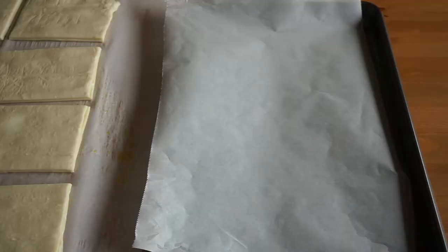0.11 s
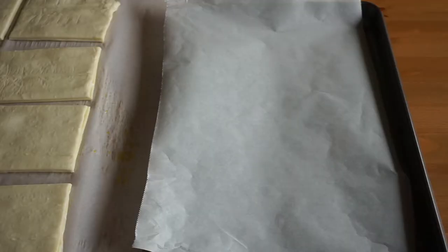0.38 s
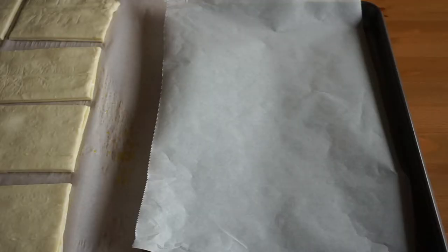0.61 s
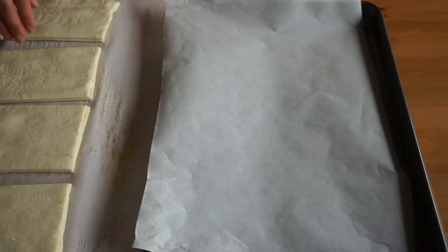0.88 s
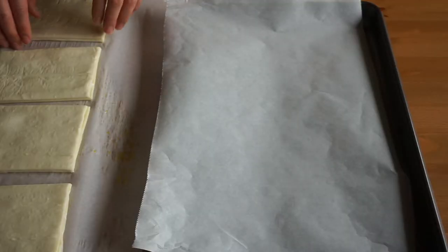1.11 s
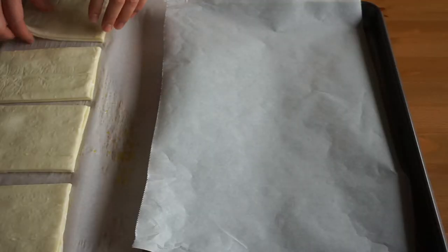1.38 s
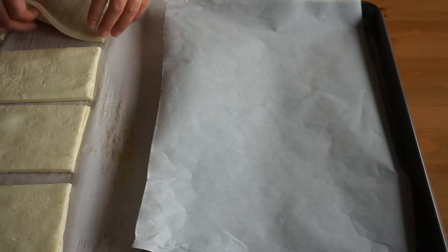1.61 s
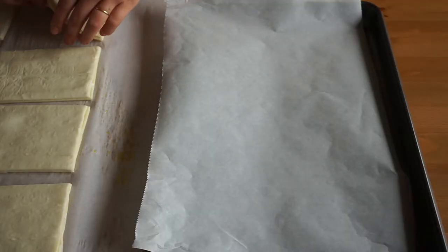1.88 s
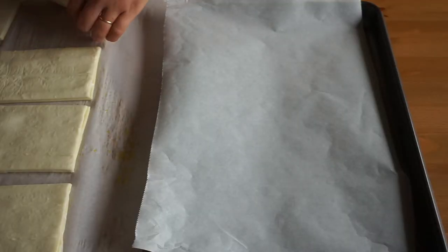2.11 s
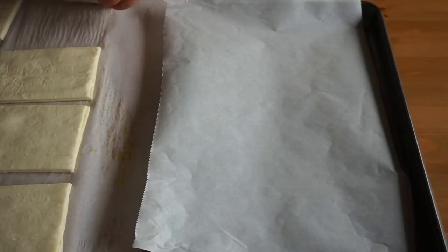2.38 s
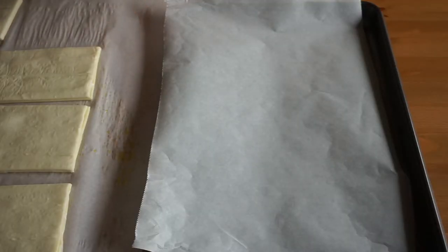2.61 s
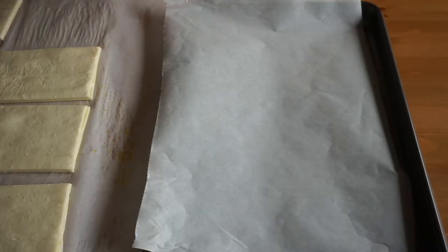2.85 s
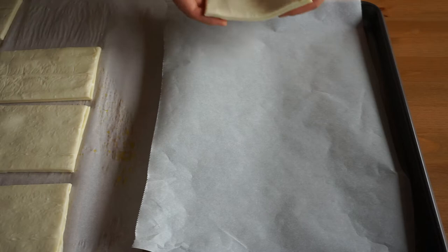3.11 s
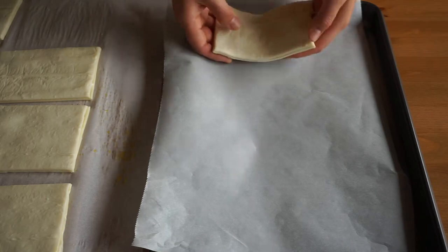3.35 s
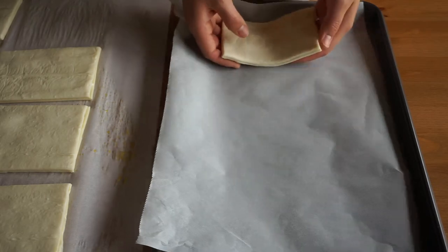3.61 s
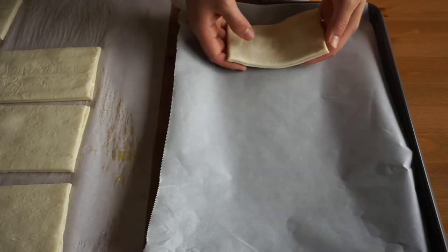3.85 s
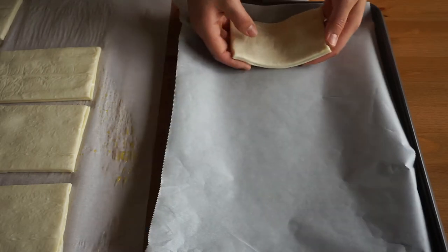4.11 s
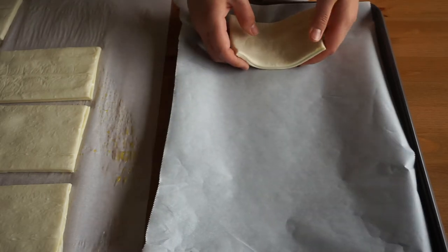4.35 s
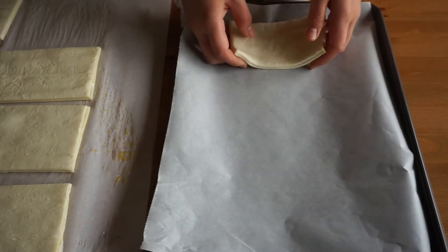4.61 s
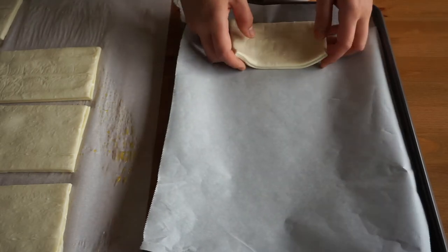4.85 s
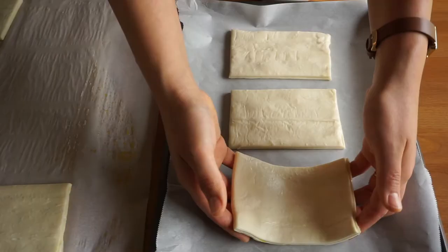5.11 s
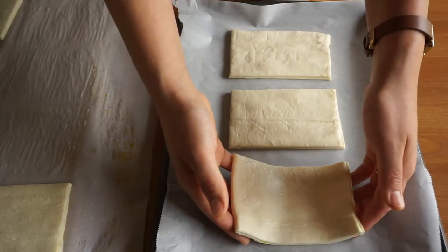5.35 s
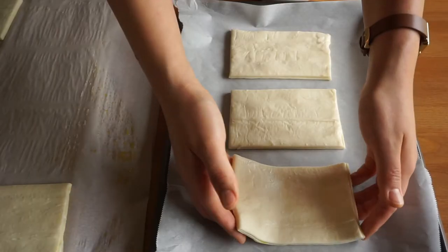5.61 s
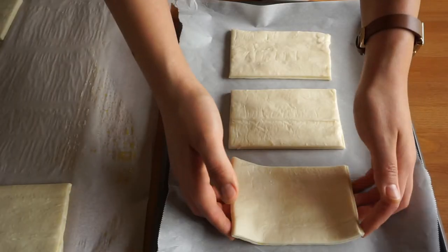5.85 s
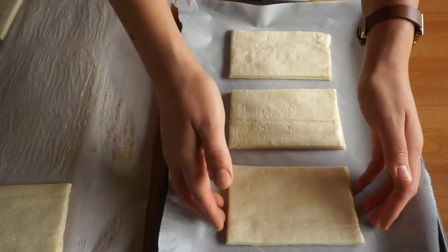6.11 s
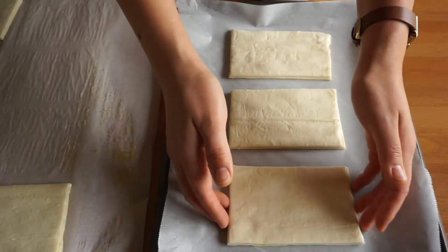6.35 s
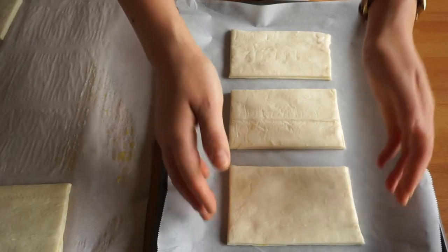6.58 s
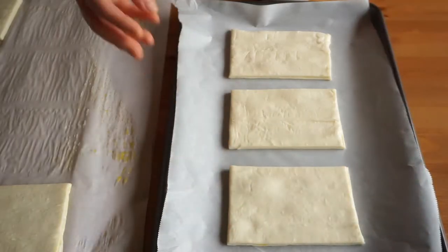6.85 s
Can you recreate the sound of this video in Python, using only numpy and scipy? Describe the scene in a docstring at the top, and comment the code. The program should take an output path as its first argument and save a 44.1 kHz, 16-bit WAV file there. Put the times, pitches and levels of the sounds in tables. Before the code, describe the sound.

A low kitchen appliance hum, deep and slowly beating, runs throughout with soft airy fan noise. For the first 1.3 seconds there is little else, only a very faint squeak near 0.8 and barely audible rubbing on the left. From 1.3 to 2.5 small dry paper ticks appear left of centre, sharpest around 1.8 to 2.0 and again near 2.45, as pastry peels off parchment. A lull follows until 3.3. Then parchment on the tray bursts into loud, dense crackling and hard snaps, strongest at 3.44 and 3.77, now central, with hissy sliding strokes. It thins after 3.8, flares at 4.5 to 4.7, and rubs softly until about 5.1. Quiet brushing leads to another crisp cluster at 5.8 to 5.95, lighter rustling, a clear snap at 6.47, then mostly hum until 7. The paper is close, with a short room tail.

```python
"""Appliances hum in a kitchen, the mains buzz beating slowly against a motor running just below it.
Then slabs of pastry are peeled off one sheet of baking parchment and laid on another, on a tray.
Hum is summed cosines and airflow shaped noise; fingers and dough slide as fluttering noise.
Small folds crackle as clumped, ringing impulses; creases snap as noise bursts of a few ms.
The paper sounds also pass through the echoes and reverberant tail of the kitchen."""
import sys
import numpy as np
from scipy import signal
from scipy.fft import rfft, irfft, next_fast_len
from scipy.io import wavfile

SR = 44100
rng = np.random.default_rng(int(sys.argv[2]) if len(sys.argv) > 2 else 0)


def gain_from_decibels(decibels):
    """Convert decibel values to linear amplitude factors."""
    exponent = np.asarray(decibels, float) / 20
    return 10 ** exponent


def put_to_file(sound):
    """Save the sound as 16-bit audio at rate SR, in the file named by the first command-line argument."""
    columns = np.atleast_2d(sound).T  # one column per channel
    safe = np.clip(columns, -1, 1)
    whole_steps = np.round(safe * 32767)
    wavfile.write(sys.argv[1], SR, whole_steps.astype(np.int16))


N = 307244


def rms_one(x):
    """Scale to rms 1."""
    return x / np.sqrt(np.mean(x ** 2) + 1e-20)


def at_hz(points, hz):
    """Read a table on a log-frequency axis."""
    table_hz, values = np.transpose(points)
    return np.interp(np.log(hz), np.log(table_hz), values)


def in_time(rows):
    """Join the rows of a (s, value) table by straight lines, one value per sample."""
    return np.interp(np.arange(N) / SR, *np.transpose(rows))


def drift(corner_hz):
    """Slow random wander of rms 1: noise through two equal poles, worked out at every 40th sample."""
    step = 40
    r = np.exp(-2 * np.pi * corner_hz * step / SR)
    settle = 2000
    noise = rng.standard_normal(N // step + settle + 2)
    slow = signal.lfilter([1], [1, -2 * r, r * r], noise)[settle:]
    return np.interp(np.arange(N) / step, np.arange(len(slow)), rms_one(slow))


def resonance(x, hz, width_hz):
    """Two-pole band with gain 1 on top."""
    r = np.exp(-np.pi * width_hz / SR)
    zeros = np.array([1, 0, -1]) * (1 - r * r) / 2
    poles = [1, -2 * r * np.cos(2 * np.pi * hz / SR), r * r]
    return signal.lfilter(zeros, poles, x)


def coloured(x, spectrum):
    """Filter by a (Hz, dB) table; rms 1."""
    size = next_fast_len(N)
    hz = np.maximum(np.arange(size // 2 + 1) * SR / size, 1)
    return rms_one(irfft(rfft(x, size) * gain_from_decibels(at_hz(spectrum, hz)), size)[..., :N])


def sides(pan_db):
    """Left and right gains; positive pan is left."""
    return gain_from_decibels(np.array([pan_db, -pan_db]) / 2)


# Hum lines. Each row: multiple of the source's rate, level in dB rms.
MAINS_LINES = [(2, -52), (4, -72.5)]
MOTOR_LINES = [(2, -59.5), (4, -67.5), (5, -71), (6, -64.5), (8, -67.5), (10, -83), (12, -77.5)]
COMPRESSOR_LINES = [(3, -67), (6, -66), (9, -64), (10, -72), (13, -76), (19, -83), (21, -83), (25, -75),
                    (36, -73), (38, -79), (41, -79), (42, -72), (43, -73), (44, -80), (45, -74), (60, -86)]
FAN_LINES = [(1, -92), (2, -59.5), (3, -59.5), (5, -65.5)]
MAINS_HZ, MOTOR_HZ, COMPRESSOR_HZ, FAN_HZ = 59.98, 59.388, 58.917, 84.63
BEAT_CREST_S = 0.65


def hum():
    """Steady lines on multiples of each rate; mains and motor lie so close that they beat."""
    t = np.arange(N) / SR - BEAT_CREST_S
    out = np.zeros((2, N))
    sources = ((MAINS_HZ, MAINS_LINES), (MOTOR_HZ, MOTOR_LINES),
               (COMPRESSOR_HZ, COMPRESSOR_LINES), (FAN_HZ, FAN_LINES))
    for rate_hz, lines in sources:
        for multiple, level_db in lines:
            hz = multiple * rate_hz
            # short waves reach the two channels out of step
            lag_rad = rng.normal(0, 1) * min(hz / 900, 2)
            phase = 2 * np.pi * hz * t + np.array([[lag_rad], [-lag_rad]]) / 2
            out += np.sqrt(2) * gain_from_decibels(level_db) * np.cos(phase)
    return out


# Airflow spectrum. Each row: frequency in Hz, relative density in dB per Hz.
AIR_SPECTRUM = [(13, -43), (22, -0.5), (71, -8), (119, -5), (206, -10), (253, -2.5), (461, -11), (539, -9),
                (955, -17.5), (1210, -16), (2250, -21.5), (2560, -26), (2850, -26), (9410, -32.5),
                (11000, -32.5), (14300, -71), (22000, -120)]
AIR_DB = -51.5  # rms, without the peaks
# Housing resonances. Each row: frequency in Hz, width in Hz, level in dB rms.
HOUSING_PEAKS = [(174.5, 48, -59.5), (324, 36, -64.5), (599, 72, -63.5), (2130, 27, -74), (2463, 31, -67.5)]
# Stereo correlation of the airflow. Each row: frequency in Hz, left-right correlation.
AIR_LIKENESS = [(30, 0.86), (60, 0.91), (140, 0.89), (340, 0.79), (820, 0.37), (1950, 0), (4670, 0),
                (11200, -0.0)]


def air():
    """Airflow of the appliances with the resonances of their housings, alike left and right only in the bass."""
    size = next_fast_len(N)
    hz = np.maximum(np.arange(size // 2 + 1) * SR / size, 1)
    alike = np.clip(at_hz(AIR_LIKENESS, hz), -1, 1)
    mid, side = rfft(rng.standard_normal((2, size)))
    spectra = np.sqrt(1 + alike) * mid + np.sqrt(1 - alike) * side * [[1], [-1]]
    white = irfft(spectra, size)[:, :N]
    out = gain_from_decibels(AIR_DB) * coloured(white, AIR_SPECTRUM)
    for peak_hz, width_hz, level_db in HOUSING_PEAKS:
        out += gain_from_decibels(level_db) * rms_one(resonance(white, peak_hz, width_hz))
    return out


# Reverberation. Each row: frequency in Hz, time to fall 60 dB in s.
KITCHEN_T60 = [(500, 0.98), (2500, 0.58), (10000, 0.25)]
TAIL_DB = -9.5  # tail energy per channel against the direct sound
# Echoes off tray, table and wall. Each row: nominal delay in ms, gain in dB.
ECHOES = [(2.2, -31), (5.5, -16), (11.5, -34)]


def kitchen(x):
    """A few early echoes plus a noise tail that dies faster in the treble, its own in each channel."""
    size = SR // 2
    t = np.arange(size) / SR
    tail = np.zeros((2, size))
    for low_hz in 250 * 2.0 ** np.arange(6):
        octave = signal.butter(2, [low_hz, 2 * low_hz], "band", fs=SR, output="sos")
        t60_s = at_hz(KITCHEN_T60, low_hz * np.sqrt(2))
        tail += signal.sosfilt(octave, rng.standard_normal((2, size))) * gain_from_decibels(-60 * t / t60_s)
    tail *= np.clip(t / 0.00068, 0, 1)
    response = gain_from_decibels(TAIL_DB) * tail / np.sqrt(np.sum(tail ** 2) / 2)
    for delay_ms, echo_db in ECHOES:
        delays = (delay_ms * SR / 1000 * rng.uniform(0.9, 1.1, 2)).astype(int)
        response[[0, 1], delays] += gain_from_decibels(echo_db)
    return signal.fftconvolve(x, response, axes=1)[:, :N]


SWELL_RANGE_DB = 15  # rise or fall covered in one swell or fade time


def swells(rows):
    """Power sum of levels that swell to a top and fade, evenly in dB; worked out at every 32nd sample."""
    t = np.arange(0, N + 32, 32) / SR
    top_s, top_db, swell_s, fade_s = np.transpose(rows)[:, :, None]
    away = np.maximum((top_s - t) / swell_s, (t - top_s) / fade_s)
    level = np.sqrt(np.sum(gain_from_decibels(top_db - SWELL_RANGE_DB * away) ** 2, axis=0))
    return np.interp(np.arange(N) / SR, t, level)


# Each row: loudest moment in s, level in dB, swell in s, fade in s.
SQUEAKS = [(.8, -57, .04, 0.046), (.868, -57, 0.028, 0.044)]
SQUEAK_HZ, SQUEAK_WIDTH_HZ, SQUEAK_PAN_DB = 1720, 240, 1.7


def squeak():
    """Faint squeak: noise twice through a narrow resonance, from the left."""
    noise = rng.standard_normal(N)
    for _ in range(2):
        noise = resonance(noise, SQUEAK_HZ, SQUEAK_WIDTH_HZ)
    return swells(SQUEAKS) * rms_one(noise) * sides(SQUEAK_PAN_DB)[:, None]


# Rubbing spectrum. Each row: frequency in Hz, relative density in dB per Hz.
SLIDE_SPECTRUM = [(500, -6), (1500, -4), (2500, 1.5), (4500, 3), (7000, 3.5), (9500, 3), (11500, 5)]
# Strokes over the paper. Each row: loudest moment in s, level in dB, swell in s, fade in s.
STROKES = [(.87, -55, 0.079, .05), (1.176, -55, 0.097, 0.043), (1.43, -55.5, 0.43, .2),
           (1.55, -51.5, 0.062, 0.085), (1.89, -50, 0.098, .08), (1.99, -51, 0.11, 0.58),
           (2.24, -62, .2, .07), (2.43, -60.5, 0.23, 1), (3.37, -45, 0.019, .3), (3.485, -34, .06, 0.071),
           (3.66, -32.5, .1, 0.22), (3.77, -32.5, 0.049, 0.041), (3.99, -40, 0.35, 0.09),
           (4.28, -46.5, .3, 0.05), (4.36, -42, 0.084, 0.096), (4.434, -37.5, 0.052, 0.04),
           (4.525, -34, 0.016, .04), (4.695, -34.5, 0.13, .1), (4.96, -32, .18, 0.081),
           (5.05, -37.5, 0.13, 0.015), (5.19, -52, 0.051, .12), (5.475, -43, 0.14, 0.033),
           (5.664, -49, 0.24, 0.16), (5.837, -37.5, 0.033, .07), (5.914, -36, 0.036, 0.04),
           (6.1, -36, 0.12, .08), (6.325, -41.5, 0.28, .04), (6.44, -42, 0.036, 0.19)]


def slide(rough_db, apart):
    """Skin and dough rubbing the coated paper: fine noise that flutters and swells with each stroke."""
    mid, side = rng.standard_normal((2, N))
    flutter = gain_from_decibels(rough_db * (drift(44) + 0.79 * drift(23)))
    hiss = coloured(flutter * (mid + apart * side * [[1], [-1]]), SLIDE_SPECTRUM)
    return swells(STROKES) * hiss


# Fold spectrum. Each row: frequency in Hz, relative density in dB per Hz.
CRACKLE_SPECTRUM = [(200, -49), (400, 0.5), (700, 1.5), (1200, 0.5), (1700, 3.5), (2600, 4.5), (4500, -2),
                    (7000, -8.5), (11500, -16)]


def crackle(per_s, spread_db, clump_db, colour_db, cycles):
    """Tiny folds give way in clumps; each rings a few cycles; fold sizes, and so the colour, keep shifting."""
    size_db = spread_db * np.minimum(rng.exponential(1, N), 3.5)
    sizes = gain_from_decibels(size_db) * rng.choice([-1, 1], N)
    born = rng.random(N) < per_s * gain_from_decibels(clump_db * drift(40)) / SR
    folds = sides(4.0 * rng.standard_normal(N)) * sizes * born
    pitches_hz = np.geomspace(400, 10500, 14)
    dealt = rng.integers(0, len(pitches_hz), N)
    rings = np.zeros((2, N))
    for k, hz in enumerate(pitches_hz):
        struck = folds * (dealt == k) * gain_from_decibels(colour_db * drift(18.3))
        rings += rms_one(resonance(struck + 1e-18, hz, hz / cycles)) * np.sqrt(hz)
    return coloured(rings, CRACKLE_SPECTRUM)


# Sheet pressed onto the tray. Each row: start in s, end in s, deep folds against crackle level in dB.
PRESSING = [(1.81, 2.03, -8.5), (3.33, 3.604, -7.5), (3.604, 4.407, -11), (4.506, 4.648, -4),
            (4.68, 5.077, -10), (5.804, 6.15, -14)]
TRAY_HZ = 1544  # folds below this sound only where the sheet is pressed on the tray


def pressing():
    """Gain of the deep folds: none outside the spells of pressing."""
    t = np.arange(N) / SR
    return sum(gain_from_decibels(share_db) * (t > start_s) * (t <= end_s) for start_s, end_s, share_db in PRESSING)


# How hard the paper is worked. Each row: time in s, crackle level in dB.
HANDLING = [(0, -67), (1.2, -67), (1.44, -62.5), (1.78, -63), (1.84, -55.5), (2.02, -46), (2.06, -55.5),
            (2.3, -63.5), (2.46, -51), (2.64, -66), (3.32, -72), (3.36, -37), (3.5, -38), (3.85, -42.5),
            (3.94, -49.5), (4.0, -39), (4.08, -57), (4.35, -51), (4.495, -53.5), (4.535, -38), (4.57, -48),
            (4.8, -51.5), (5.04, -45), (5.09, -60.5), (5.39, -63.5), (5.48, -54), (5.54, -64.5),
            (5.9, -52.5), (6.11, -55), (6.33, -57.5), (6.4, -66), (6.48, -51.5), (6.7, -65), (6.97, -68.5)]
CROWD_DB, GATHER_DB_PER_S, DISPERSE_DB_PER_S = -17, 4000, 468  # crowd level is against a snap's body


def crowding():
    """Crackle level: the working of the paper plus the crowd of small folds round each snap."""
    gather_s, disperse_s = SWELL_RANGE_DB / GATHER_DB_PER_S, SWELL_RANGE_DB / DISPERSE_DB_PER_S
    crowds = []
    for start_s, level_db, body_hz, treble_db, length_ms in SNAPS:
        body_db = level_db - 10 * np.log10(1 + gain_from_decibels(treble_db) ** 2)
        crowds.append((start_s + length_ms / 1000, body_db + CROWD_DB, gather_s, disperse_s))
    return np.hypot(gain_from_decibels(in_time(HANDLING)), swells(crowds))


# Creases. Each row: start in s, level in dB, body in Hz, treble against body in dB, length in ms.
SNAPS = [(1.3273, -40, 2820, 12, 1.1), (1.35, -35, 4070, 12, 0.79), (1.4142, -37, 2370, 12, 1.7),
         (1.424, -35.5, 4000, 9, 1.1), (1.439, -38.5, 4250, 5, 1.1), (1.54, -39.5, 5500, 11, 2.7),
         (1.5591, -36, 1950, 9, .75), (1.7562, -36.5, 2760, -1, 0.9), (1.8033, -35, 2840, -10, 1.4),
         (1.8168, -21.5, 3000, -1, 0.49), (1.8176, -37, 1320, -25, 5.6), (1.8856, -31, 2250, -4, 1.1),
         (1.924, -27.5, 3960, 6, .85), (1.9679, -18.5, 3640, -3, 1.07), (1.9725, -34, 3520, 10, 2.5),
         (2.01, -28, 3500, -13, 2), (2.1725, -32, 2420, 32, 0.83), (2.2289, -38.5, 2170, 2, 5.3),
         (2.251, -38, 3010, 5, 1.6), (2.322, -41, 2380, -12, 1.7), (2.421, -24.5, 4600, 1, 0.67),
         (2.4373, -26, 3890, 20, 0.92), (2.4462, -31, 3200, -1, 1.7), (2.451, -29.5, 3300, -9, 1.6),
         (2.49, -27.5, 5500, 19, 1.05), (3.3366, -36, 2460, -28, 4.7), (3.3528, -28, 2200, -1, 3.9),
         (3.4049, -33, 5370, -12, 1.4), (3.4134, -20, 3840, -4, 1.9), (3.4336, -18, 3010, -21, .9),
         (3.4398, -8.5, 2820, 5, 0.85), (3.449, -17.5, 2640, -14, 1.1), (3.471, -24, 2530, -6, 2.1),
         (3.479, -24, 2500, -9, 3.0), (3.4836, -17, 1570, -2, 3.8), (3.4977, -25, 2130, -7, 2.3),
         (3.525, -29, 1740, -6, 3.5), (3.5455, -23, 3000, 5, 2.5), (3.5504, -13, 2700, -0.5, 1.3),
         (3.569, -18, 2830, -21, 1.4), (3.5842, -27, 3010, -8, 1.4), (3.5942, -16, 2940, 1.5, 2.1),
         (3.6126, -31, 3730, -17, 2.5), (3.628, -31, 3280, -21, 4), (3.637, -21.5, 5500, 7, 2.5),
         (3.6492, -19.5, 4070, -1, 2.3), (3.6658, -20.5, 4100, -16, 3.3), (3.7053, -26, 4540, -17, 1.8),
         (3.7214, -30, 5400, -6, 4.5), (3.7622, -17, 2730, -3, 1.6), (3.7687, -8, 2000, 9, 1.2),
         (3.7783, -22.5, 2030, 0, 2.5), (3.8143, -27.5, 3000, -16, 3.7), (3.9107, -28.5, 3350, -6, 1.5),
         (4.023, -34.5, 2700, -9, 2.1), (4.1335, -40.5, 1570, -10, 11), (4.232, -25.5, 3500, 2.5, .81),
         (4.2807, -28, 1550, -2.5, 1.6), (4.3676, -36, 2100, -14, 3.2), (4.4253, -33.5, 3750, 1, 6.8),
         (4.5108, -14, 2260, 5, 0.52), (4.5247, -26, 3140, -16, 2.4), (4.5325, -24, 1970, -2, 2.5),
         (4.542, -26, 2170, 1, 2.6), (4.5472, -26, 2830, -4, 3), (4.5805, -14.5, 2840, 3, 1.16),
         (4.6103, -22.5, 1710, 0.5, 3.3), (4.678, -30, 2640, -9, 1.6), (4.6909, -18, 3100, -3.5, 3.3),
         (4.6995, -27, 2480, -6, 1.4), (4.7662, -37, 5050, -10, 1.7), (4.82, -33.5, 2700, 1, 2.8),
         (4.9124, -30, 2580, -7, 1.9), (5.0, -33, 3100, -15, 1), (5.131, -38, 2250, -16, 1.8),
         (5.4825, -31, 2270, 5, 1.8), (5.7588, -35, 2700, 3, 1.9), (5.8015, -32, 2580, 1, 2.1),
         (5.8281, -18.5, 2820, 13, 1), (5.8379, -25, 2400, -5, 1.4), (5.875, -28.5, 2480, 0, 1.3),
         (5.906, -18.5, 2500, 6.5, 2.2), (5.948, -18, 2340, 3.5, 2.4), (5.9584, -31, 2180, -20, 2),
         (6.0968, -29.5, 3700, -14, 1.7), (6.1382, -24, 2900, -34, 1.1), (6.4688, -17.5, 3280, 4.5, 2.3),
         (6.481, -40, 2500, 5, 1.7), (6.4984, -31, 3400, 22, 3.1), (6.6257, -43, 2510, 14, 2.9)]
# Hands move from the sheet on the left to the tray. Each row: time in s, left over right in dB.
HANDS = [(0, 8), (1.42, 5.5), (2.25, 2.5), (2.7, 5), (3.3, 1.2), (3.62, -0.5), (4.2, 0.1), (4.9, -0.1),
         (6.97, 0.7)]
SNAP_SIDE, SNAP_SCATTER_DB = 2.44, 0.1  # snaps lie further out than the hands, and scattered


def snaps():
    """Each buckling crease is a few ms of dying noise: a broad body resonance plus a shorter treble tick."""
    size = 2048
    out = np.zeros((2, N + size))
    ms = np.arange(size) * 1000 / SR
    treble = signal.butter(2, 5500, "high", fs=SR, output="sos")
    for start_s, level_db, body_hz, treble_db, length_ms in SNAPS:
        low, high, apart = rng.standard_normal((3, size))
        pan_db = SNAP_SIDE * np.interp(start_s, *np.transpose(HANDS)) + rng.normal(0, SNAP_SCATTER_DB)
        rise = np.minimum(ms / (0.2 * length_ms), 1)
        shape = rise * gain_from_decibels(-5.0 * ms / length_ms)
        body = resonance(resonance(low, body_hz, 0.29 * body_hz), body_hz, 4.2 * body_hz)
        body = rms_one(shape * body)
        bass_cut = signal.butter(2, 0.52 * body_hz, "high", fs=SR, output="sos")
        body = rms_one(signal.sosfilt(bass_cut, body))
        hiss = signal.sosfilt(treble, high + 0.5 * apart * np.array([[1], [-1]]))
        tick = gain_from_decibels(treble_db) * rms_one(rise * gain_from_decibels(-6.0 * ms / length_ms) * hiss)
        burst = rms_one(body + tick) * np.sqrt(np.mean(shape ** 2) / 2)
        at = round(start_s * SR)
        out[:, at:at + size] += gain_from_decibels(level_db) * burst * sides(pan_db)[:, None]
    return out[:, :N]


def scene():
    """Paper in the kitchen over the hum."""
    background = hum() + air()
    rubbing = slide(rough_db=1.5, apart=0.88)
    folds = crackle(per_s=2500, spread_db=2.0, clump_db=3.0, colour_db=2.0, cycles=2.5)
    thin = rms_one(signal.sosfilt(signal.butter(3, TRAY_HZ, "high", fs=SR, output="sos"), folds))
    deep = rms_one(signal.sosfilt(signal.butter(3, TRAY_HZ, "low", fs=SR, output="sos"), folds))
    level = crowding()
    at_hands = (level * thin + rubbing) * sides(in_time(HANDS))
    on_tray = level * pressing() * deep
    paper = squeak() + at_hands + on_tray + snaps()
    return background + paper + kitchen(paper)


def band_limit(x):
    """A steep low-pass at the top of the band."""
    return signal.sosfilt(signal.butter(12, 11750, fs=SR, output="sos"), x)


CUTOFF_HZ = 11000


def record(dry):
    """Steep treble cut, overall rms kept."""
    slope = [(CUTOFF_HZ - 100, 0), (CUTOFF_HZ + 100, -12), (CUTOFF_HZ + 250, -38), (13500, -50)]  # (Hz, dB)
    mix = coloured(dry, slope) * np.sqrt(np.mean(dry ** 2))
    return band_limit(mix)


dry = scene()
out = record(dry)
put_to_file(out)
```